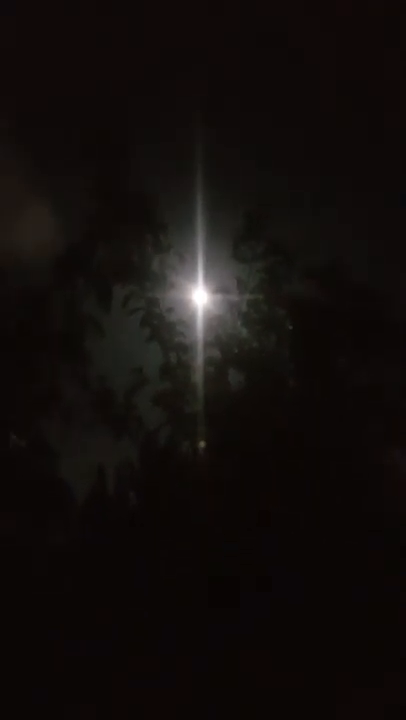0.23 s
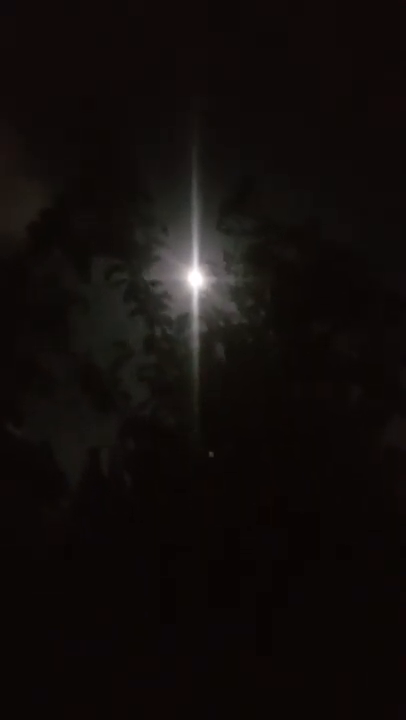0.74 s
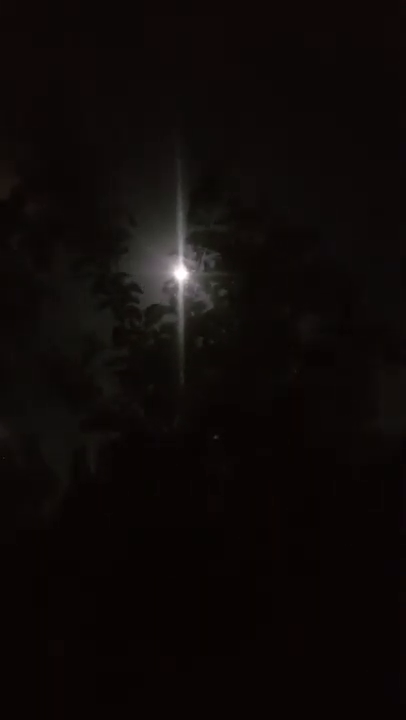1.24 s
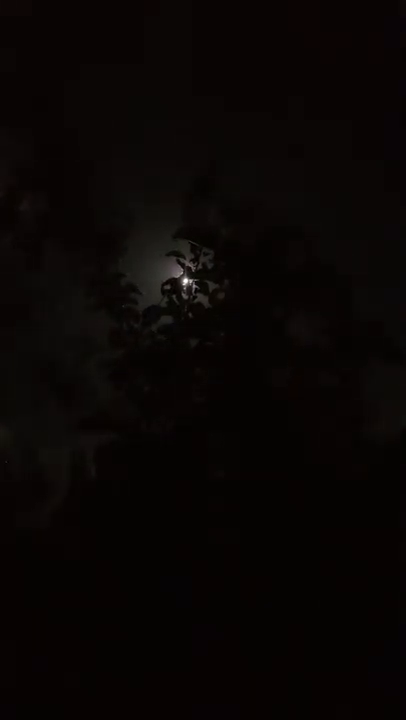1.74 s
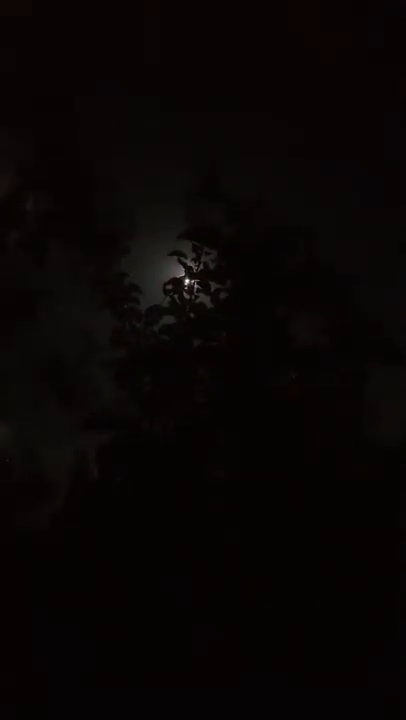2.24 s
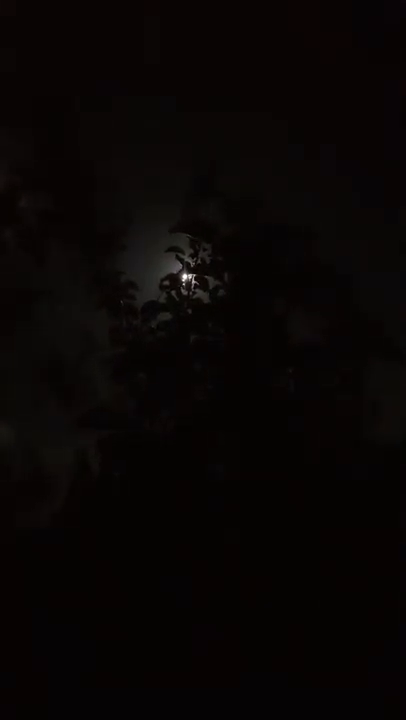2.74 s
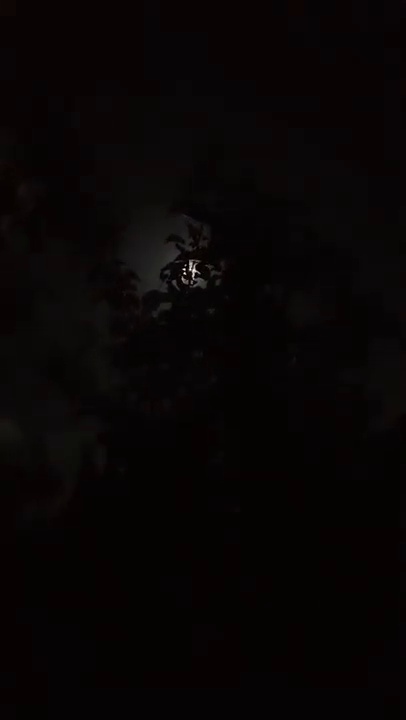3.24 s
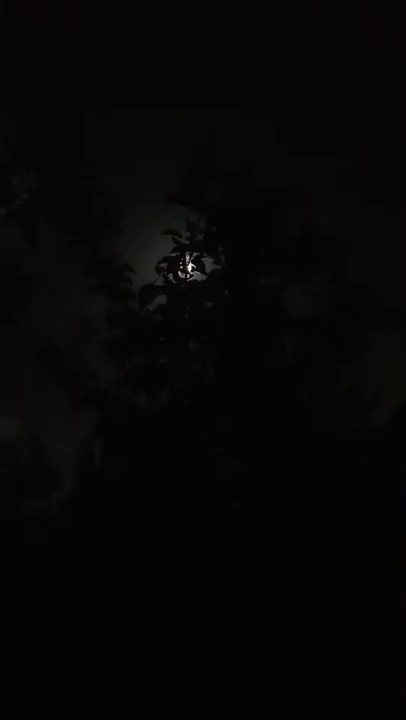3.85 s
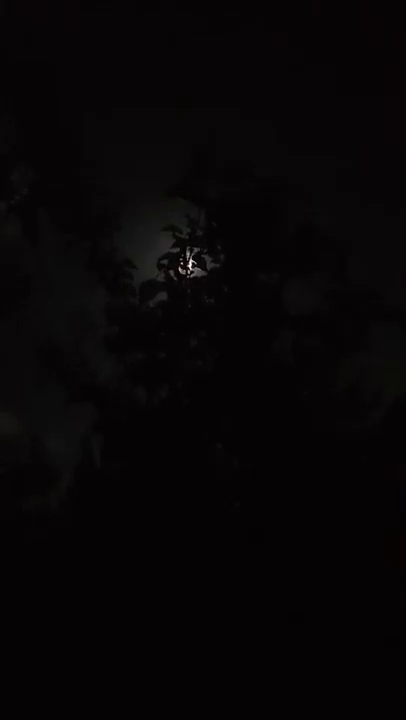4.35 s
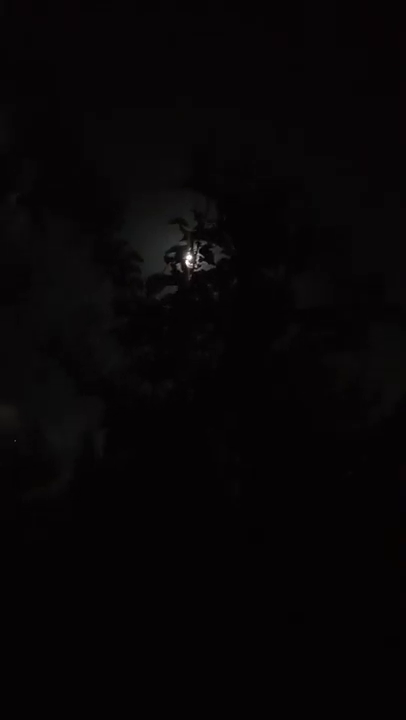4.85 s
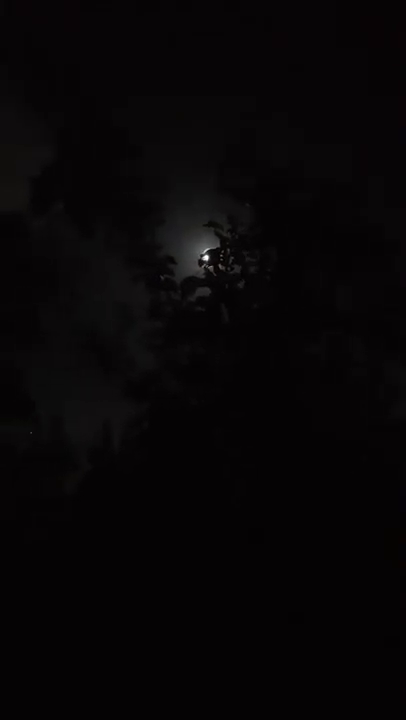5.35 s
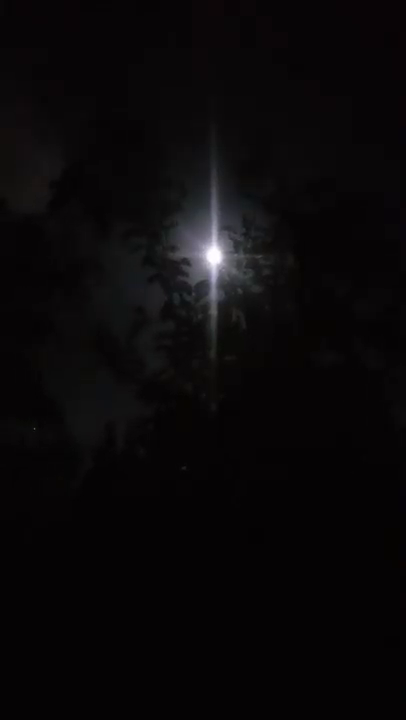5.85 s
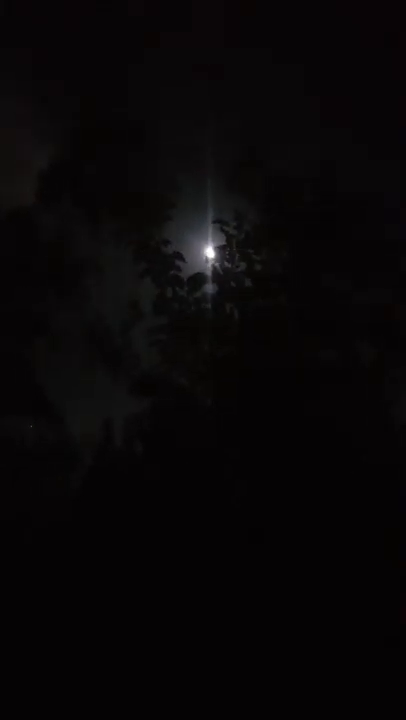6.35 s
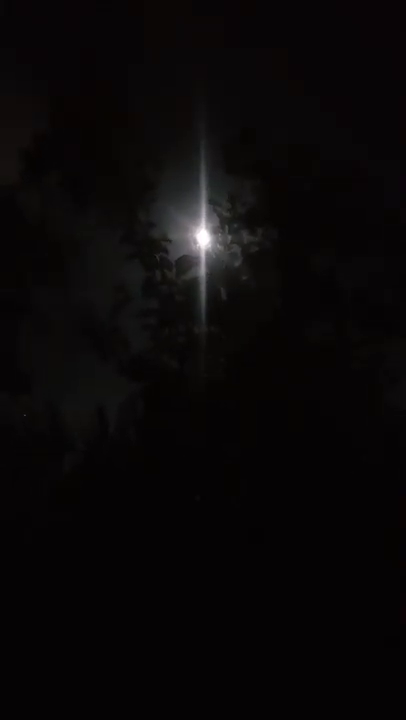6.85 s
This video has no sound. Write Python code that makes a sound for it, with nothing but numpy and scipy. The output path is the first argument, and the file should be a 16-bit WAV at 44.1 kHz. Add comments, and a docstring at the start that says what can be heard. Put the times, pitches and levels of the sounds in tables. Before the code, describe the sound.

Low wind buffets, mostly on the left, open over soft hiss with small clicks of fingers on the device. A nightingale then sings for about two seconds, clear and bright, from faint thin notes to loud repeated whistles, a rough buzz, quick low notes and a final chip. Branches and ground return short echoes. The bird stops; quiet handling noise continues in the night air.

```python
"""Fingers tap, tick and rub on a hand-held camera over a quiet hiss, while light air buffets the microphone.
Out of this, from a tree at night, a nightingale sings one phrase of gliding tones: a peep, a thin quaver,
a sigh, a whistle, four hooked notes, two slurs, a two-voiced buzz, a squeal, four low loops and a sharp chip.
Delayed copies throw the song back from ground and branches, and decaying scatter adds the trees.
Afterwards the hand, hiss and puffs of air, all shaped noise, go on alone."""
import sys
import numpy as np
from scipy import signal
from scipy.fft import rfft, irfft
from scipy.io import wavfile
from scipy.ndimage import uniform_filter1d

SR = 44100
rng = np.random.default_rng(int(sys.argv[2]) if len(sys.argv) > 2 else 0)


def master_out(mix):
    """Clip the mix to full scale and print it as 16-bit PCM to the path in sys.argv[1]."""
    frames = np.transpose(np.atleast_2d(mix))
    ceiling = np.clip(frames, -1, 1)
    pcm = np.round(ceiling * 32767).astype(np.int16)
    wavfile.write(sys.argv[1], SR, pcm)


N = 313551
TIME, BINS = np.arange(N) / SR, np.fft.rfftfreq(N, 1 / SR)  # s, Hz
EDGE_HZ = 15900  # top of the audible band in this scene
CLEAR = .0025  # rms pitch jitter of a clear note, as a share of its pitch

# How each syllable is voiced, before the song stretches and levels it. Each entry: length, attack and release
# in seconds, fade over the note in dB, overtone level in dB, left-right difference in dB.
VOICES = dict(peep=(.018, .004, .008, -1, -8, 0), quaver=(.050, .025, .021, 0, 2, 9),
          sigh=(.042, .016, .007, 0, -2, 0), scoop=(.040, .004, .003, 1, -10, 0),
          whistle=(.037, .014, .012, 0, -10, 0), pip=(.019, .004, .005, 0, -10, -2),
          hook_up=(.039, .023, .006, 0, -3, 3.5), hook_down=(.046, .013, .012, -3, 0, 1),
          slur=(.075, .003, .026, 1, -11, -3.5), buzz_high=(.022, .004, .005, 0, 12, 7.5),
          buzz_low=(.021, .004, .006, 0, 9, 2), squeal=(.042, .008, .005, -5, 0, 8),
          loop_down=(.019, .0025, .006, -13, -5, -4), loop_up=(.025, .012, .007, 2, -5, 0),
          chip=(.020, .007, .008, -5, 0, 2), chip_tail=(.036, .006, .008, -1, -6, 0),
          rasp=(.032, .004, .008, -5, 2, 2))


def amp(db):
    """Decibels to gain."""
    return 10 ** (np.asarray(db) / 20)


def evened(x):
    """Scales to rms 1."""
    return x / np.sqrt(np.mean(abs(x) ** 2) + 1e-20)


def read(points, hz):
    """Reads a table of (Hz, value) on a log-frequency axis."""
    f, value = np.transpose(points)
    return np.interp(np.log(hz + 1), np.log(f + 1), value)


def add(mix, s, sound):
    """Mixes a sound in at a time in seconds."""
    part = mix[:, max(round(s * SR), 0):][:, :sound.shape[-1]]
    part += sound[..., :part.shape[-1]]


def pan(db):
    """Left and right gains for a level difference; positive leans left."""
    return amp(np.array([[.5], [-.5]]) * db)


def noise(count, colour):
    """Noise of rms 1 whose spectrum is shaped by the gain function colour(Hz)."""
    spectrum = rfft(rng.standard_normal(count))
    return evened(irfft(spectrum * colour(np.fft.rfftfreq(count, 1 / SR)), count))


def delayed(x, s):
    """Delays a sound by any fraction of a second, by turning the phase of its spectrum."""
    return irfft(rfft(x) * np.exp(-2j * np.pi * BINS * s), N)


def from_side(x, lag):
    """A sound from one side reaches the left port lag seconds later than the right."""
    return np.array([delayed(x[0], lag), x[1]])


def bell(f, hz, octaves):
    """A smooth band around a centre frequency."""
    return np.exp(-.5 * (np.log2((f + 1) / hz) / octaves) ** 2)


def swish(length, hz, octaves):
    """A short, soft-edged band of noise."""
    count = int(length * SR)
    return noise(count, lambda f: bell(f, hz, octaves)) * signal.windows.tukey(count, .6)


def night_hiss(patchy_db=1.97, flicker_db=2.0, level_db=-57.5):
    """Soft hiss with broad resonances: noise shaped per time-frequency cell, drifting in patches."""
    # Broad spectrum of the hiss. Each row: frequency in Hz, relative density in dB per Hz.
    hiss_colour = [(88, -10), (150, -0.5), (340, -0.5), (756, -13.5), (1010, 0), (1160, -15.5), (1520, -2),
                   (2120, -10), (2430, -2), (3590, -13.5), (4280, -2), (4910, -8.5), (6970, -7),
                   (8310, -17), (15800, -20)]
    # Resonances and dips on top of it. Each row: centre in Hz, width in Hz, boost in dB.
    bumps = [(239, 20, -8.5), (360, 130, 0.5), (671, 61, 7), (1630, 310, 4), (3125, 66, 6),
             (3580, 340, 2.5), (4317, 145, 5.5), (4840, 120, 1.5)]
    # How alike the two ports sound. Each row: frequency in Hz, left-right coherence from 0 to 1.
    likeness = [(60, .4), (130, 0.86), (300, 0.92), (1400, 0.64), (4000, 0.39), (8000, 0.2), (15000, 0.18)]
    # Stereo balance. Each row: frequency in Hz, left-right difference in dB.
    balance = [(60, 2), (110, -6.5), (200, 3), (380, -1.5), (700, 5), (1290, -6.5), (2380, 1), (4400, -3.5),
               (8120, 0), (15000, -7.5)]

    frames, hz = N // 256 + 5, np.fft.rfftfreq(1024, 1 / SR)
    a, b, c, d, patches = rng.standard_normal((frames, 513, 5)).T
    patches = uniform_filter1d(patches, size=14, axis=0)  # smooth over frequency
    patches = evened(uniform_filter1d(patches, size=10, axis=1))  # and over time
    flicker = evened(uniform_filter1d(rng.standard_normal(frames), size=4))  # moves all bands together

    same = read(likeness, hz)[:, None]
    left = a + 1j * b
    right = same * left + np.sqrt(1 - same ** 2) * (c + 1j * d)
    colour = read(hiss_colour, hz)
    colour = colour + sum(db * np.exp(-.5 * ((hz - f) / width) ** 2) for f, width, db in bumps)
    gain = amp(colour[:, None] + patchy_db * patches + flicker_db * flicker)
    cells = np.array([left, right]) * gain * pan(read(balance, hz))[:, :, None]
    hiss = signal.istft(cells, nperseg=1024, noverlap=768)[1][:, :N]
    return amp(level_db) * evened(hiss)


def wind(rise=.4, edge_db=-20, calm_db=-79):
    """Low buffets, unrelated at the two ports: each puff swells quickly and dies more slowly."""
    # Puffs of air, most far stronger at one port. Each row: peak time in seconds, length in seconds,
    # level in dB, left-right difference in dB.
    gusts = [(.058, .06, -45, 17), (.19, .42, -53, 15), (.51, .12, -50, 9), (.567, .06, -32.5, 32),
             (.63, .17, -37, 32), (.755, .08, -36, 33), (.88, .22, -38, 30), (.95, .15, -50, -6),
             (1.05, .22, -49, 18), (1.248, .055, -36, 35), (1.29, .09, -47, 25), (1.46, .16, -54, -2),
             (1.55, .07, -43, 22), (1.615, .13, -40.5, 25), (1.715, .08, -41, 32), (1.91, .24, -53, -12),
             (2.73, .12, -56, -22), (2.8, .1, -52, -24), (3.3, .08, -45, -29), (3.48, .11, -54, -22),
             (4.29, .25, -63, -8), (5.727, .09, -50, -28), (5.98, .11, -56, -17), (6.09, .16, -45.5, -31),
             (6.65, .12, -57, -3)]
    # Spectrum of the turbulence. Each row: frequency in Hz, relative level in dB.
    wind_colour = [(15, -36), (30, -14), (50, 2.5), (75, -0.5), (110, -12.5), (160, -22.5), (250, -33.5),
                   (340, -32.5), (550, -68), (1500, -65)]

    power = np.full((2, N), amp(calm_db) ** 2)  # faint air between the puffs
    for s, length, db, side_db in gusts:
        # distance from the peak: -1 and 1 are the ends, where the puff is down by edge_db
        u = (TIME - s) / (length * np.where(TIME < s, rise, 1 - rise))
        sides = pan(side_db) / np.linalg.norm(pan(side_db))
        power += (sides * amp(db + edge_db * np.minimum(u ** 2, 10))) ** 2
    eddies = np.array([noise(N, lambda f: amp(read(wind_colour, f))) for port in range(2)])
    # even out the eddies' own swells over 50 ms, so that the puffs set the level
    own_power = uniform_filter1d(eddies ** 2, size=2200, axis=1)
    return eddies * np.sqrt(power / (own_power + 0.022))


def trees(x, early_db=7, early_s=.035, shared=0.08):
    """Scatter from trunks and foliage: random impulses, strong at first, then a long faint tail."""
    # How long the scatter rings. Each row: frequency in Hz, time in seconds to fall by 60 dB.
    ring_times = [(300, .6), (1900, .44), (2200, .5), (2700, .72), (4000, .53), (7000, .49), (14000, .66)]

    taps = rng.standard_normal((3, SR)) * (rng.random((3, SR)) < 3000 / SR)  # about 3000 per second
    taps = np.sqrt(shared) * taps[0] + np.sqrt(1 - shared) * taps[1:]  # a little common to both sides
    hz, t, cells = signal.stft(taps, SR, nperseg=256)
    fade_db = -60 * t / read(ring_times, hz)[:, None] + early_db * np.exp(-t / early_s)
    onset = np.clip((t - .006) / 0.0097, 0, 1)
    tail = signal.istft(cells * amp(fade_db) * onset, SR, nperseg=256)[1]
    return signal.fftconvolve(x, tail / np.linalg.norm(tail[0]), axes=1)[:, :N]


def near_echoes(x, ground_s=.0068, ground_db=-8, ground_lag=0.00013):
    """The strong ground echo beats against the gliding notes; branches add more from the sides."""
    # Echoes from near branches. Each row: delay in seconds, level in dB, extra delay on the left in seconds.
    branches = [(.0115, -6, -0.0049), (0.0199, -20, .00027), (.031, -37, 0.018)]

    ground = amp(ground_db) * from_side(delayed(x, ground_s), ground_lag)
    return ground + sum(amp(db) * from_side(delayed(x, s), lag) for s, db, lag in branches)


def tick(t60):
    """A bright snap of noise that dies at once."""
    # Spectrum of a dry tick. Each row: frequency in Hz, relative level in dB.
    tick_colour = [(1000, -16), (3000, -12), (5500, -2), (7300, -1), (8600, -13), (15000, -16.5)]

    t = np.arange(4096) / SR
    return noise(len(t), lambda f: amp(read(tick_colour, f))) * amp(-60 * t / t60)


def tap(hz, t60, octaves=0.41, rise_s=0.00053):
    """A small slip of a finger excites the case, most strongly around one pitch; scaled to peak 1."""
    # Resonances of the camera case. Each row: frequency in Hz, width in Hz, relative level in dB.
    case_modes = [(340, 110, 0), (951, 130, -5.5), (1500, 290, -5), (2570, 1200, -9)]

    def colour(f):
        """The finger's band passed through the case resonances."""
        case = sum(amp(db) / (1 + (2 * (f - mode) / width) ** 2) for mode, width, db in case_modes)
        return bell(f, hz, octaves) * case

    t = np.arange(4096) / SR
    ring = noise(len(t), colour) * amp(-60 * t / t60) * (1 - np.exp(-t / rise_s))
    return ring / abs(ring).max()


def handling(tap_db=0.5, tick_db=-9, faint_tap_db=-60, faint_tick_db=-68, spread_db=3):
    """Taps, ticks and rustles of the hand: short noise bursts, with many fainter ones between."""
    # The firmer finger taps. Each row: start in seconds, peak in dB before tap_db, pitch in Hz.
    firm_taps = [(.195, -49, 980), (.466, -51, 1030), (.709, -48.5, 1390), (.856, -49, 1480),
                 (.908, -48.5, 1460), (.993, -50, 1080), (1.104, -49, 1030), (1.68, -44.5, 1560),
                 (1.726, -47, 1640), (1.866, -46, 1570), (1.897, -44, 1580), (2.325, -41.5, 1420),
                 (2.379, -48, 1580), (2.503, -48, 1490), (2.806, -48.5, 1470), (3.068, -46, 1500),
                 (4.21, -47, 1440), (4.726, -48, 930), (5.13, -37.5, 1430), (5.147, -46.5, 990),
                 (5.229, -43, 1460), (5.457, -44, 1490), (5.567, -49, 1460), (5.799, -46, 1640),
                 (5.818, -48, 790), (6.056, -46, 960), (6.303, -45, 1610), (6.384, -47, 1790),
                 (6.64, -48.5, 1590), (6.825, -47.5, 1450)]
    # The clearer small dry ticks. Each row: start in seconds, level in dB before tick_db.
    clear_ticks = [(.149, -41), (.2836, -45), (.5372, -41.5), (1.4272, -44), (1.6467, -43), (1.815, -43),
                   (3.9744, -43), (4.1727, -41), (4.2983, -44), (5.046, -42), (5.3557, -43), (5.9824, -43),
                   (6.1493, -43), (6.509, -42.5), (7.0433, -43)]
    # Brief rubs of hand and sleeve. Each row: start in seconds, length in seconds, level in dB,
    # centre in Hz, width in octaves.
    rustles = [(.02, .3, -68, 330, .25), (0.995, 0.091, -64, 694, .9), (1.806, .13, -59, 1990, 0.37),
               (1.97, 0.06, -60, 2600, 0.14), (2.167, 0.074, -56, 4900, 0.71),
               (2.231, 0.035, -49, 5250, 0.71), (3.269, 0.15, -60, 371, 0.19), (3.6, .4, -68, 650, .8),
               (5.691, 0.077, -62, 330, 0.21), (5.131, 0.094, -65, 900, 0.65),
               (5.221, 0.031, -59.5, 1330, 0.62), (5.447, 0.16, -63, 720, 0.52),
               (6.131, 0.03, -57.5, 1650, 0.22), (5.95, .35, -65, 340, .3),
               (6.168, 0.051, -56.5, 776, 1.65), (6.589, .1, -60.5, 252, 0.67)]

    out = np.zeros((2, N))
    for s, db, hz in firm_taps:
        add(out, s, amp(db + tap_db) * pan(-1.5) * tap(hz, t60=.045))
    for s, db in clear_ticks:
        add(out, s, amp(db + tick_db) * tick(t60=.029))
    for s, length, db, hz, octaves in rustles:
        add(out, s, amp(db) * pan(-1.5) * swish(length, hz, octaves))
    # faint ones at random times: most are weak, a few stand out
    for when, size, colour, side in rng.random(size=(90, 4)):
        db = faint_tap_db - spread_db * np.log(size + 0.024)
        add(out, when * N / SR, amp(db) * pan(6 * side - 6) * tap(600 + 1200 * colour, t60=0.044))
    for when, size, side in rng.random(size=(130, 3)):
        db = faint_tick_db - spread_db * np.log(size + .03)
        add(out, when * N / SR, amp(db) * pan(8 * side - 4) * tick(t60=0.029))
    return out


def contour(name, snap_s=.003, edge_db=-20):
    """A smooth glide under an attack, a gently changing hold and a release. Rows: s, Hz, dB."""
    # Evenly spaced pitches in Hz that each syllable glides through, before the song's pitch factor.
    glides = dict(peep=[3300, 3150, 3400, 4500], quaver=[6550, 6700, 7280, 6800, 6550],
              sigh=[3980, 3450, 2850], scoop=[1900, 1740, 1850, 2550], whistle=[2550, 3150, 3290, 3290],
              pip=[3285, 3275], hook_up=[4450, 4440, 4740, 5010, 4950],
              hook_down=[4480, 4060, 3830, 3700, 3660], slur=[2700, 2680, 2700, 2600, 2230, 1740],
              buzz_high=[7200, 6950, 6850], buzz_low=[6000, 5450, 5200], squeal=[7250, 6950, 6450, 6050],
              loop_down=[1950, 1520, 1450], loop_up=[1580, 1900, 2170, 2140], chip=[3400, 4380, 3800, 2450],
              chip_tail=[2350, 1800, 1480], rasp=[4900, 4400, 3700])
    # Syllables that start sharp and snap down onto their glide: excess as a share of the pitch.
    snaps = dict(slur=.35, loop_down=.28, buzz_low=.05)

    length, attack, release, fade_db = VOICES[name][:4]
    u, pitches = np.linspace(0, 1, 200), glides[name]
    t = u * length
    curve = np.polyfit(np.linspace(0, 1, len(pitches)), pitches, len(pitches) - 1)
    hz = np.polyval(curve, u) * (1 + snaps.get(name, 0) * np.exp(-t / snap_s))
    edges = np.maximum(1 - t / attack, 0) ** 2 + np.maximum(1 - (length - t) / release, 0) ** 2
    return np.transpose([t, hz, fade_db * u + edge_db * edges])


def syllable(shape, pitch, length, jitter, overtone_db, jitter_hz=900, air_db=-47):
    """A gliding, slightly unsteady tone with two weak overtones and a trace of air noise."""
    # Overtones against the fundamental, before overtone_db. Each row: frequency in Hz, level in dB.
    overtone_levels = [(3500, -24), (5500, -27), (8000, -36), (10000, -28), (11300, -26), (14000, -23),
                       (16000, -28)]

    s, hz, db = np.transpose(shape)
    s = s * length
    t = np.arange(0, s[-1], 1 / SR)
    hz = pitch * uniform_filter1d(np.interp(t, s, hz), size=110)
    shake, flutter = (noise(len(t), lambda f: 1 / (1 + (f / jitter_hz) ** 2)) for each in range(2))
    phase = 2 * np.pi * np.cumsum(hz * (1 + jitter * shake)) / SR
    overtones = 0
    for k in (2, 3):
        level = amp(read(overtone_levels, k * hz)) * (k * hz < EDGE_HZ)
        overtones = overtones + level * np.sin(k * phase)
    # overtones are less steady than the tone
    tone = np.sin(phase) + amp(overtone_db) * overtones * (1 + .5 * flutter)
    # rough notes leak more air
    air = amp(air_db) * (jitter / CLEAR) * noise(len(t), lambda f: f / (f + 2000))
    return (tone + air) * amp(np.interp(t, s, db)) * signal.windows.tukey(len(t), .04)


def nightingale(fizz_hz=13000, fizz_octaves=.16):
    """Strings the syllables into the phrase; the two sides of the syrinx may sound together."""
    # The song. Each row: start in seconds, syllable, pitch factor, length factor, relative level in dB.
    song = [(1.655, "peep", 1, 1, -53), (2.007, "quaver", 1.015, .78, -44),
            (2.040, "quaver", .995, 1.05, -36), (2.085, "quaver", .98, .9, -37.5),
            (2.394, "sigh", 1, 1, -41), (2.396, "sigh", .78, .9, -52), (2.440, "scoop", 1, 1, -55),
            (2.476, "whistle", 1, 1, -31), (2.517, "pip", 1, 1, -35), (2.586, "hook_up", 1.005, .96, -28),
            (2.623, "hook_down", 1.018, .96, -24), (2.728, "hook_up", 1.001, .98, -26),
            (2.762, "hook_down", 1.005, .96, -21.5), (2.866, "hook_up", 1.001, .97, -26),
            (2.901, "hook_down", 1.002, .97, -21.5), (3.010, "hook_up", .99, 1, -25),
            (3.046, "hook_down", 1, .96, -21.5), (3.154, "slur", 1.003, 1, -25),
            (3.292, "slur", .985, .98, -27.5), (3.464, "buzz_high", 1, 1, -38),
            (3.464, "buzz_low", 1, 1, -39), (3.485, "buzz_high", 1.05, .9, -37),
            (3.486, "buzz_low", .95, .85, -34), (3.509, "buzz_high", 1.08, .85, -38),
            (3.508, "buzz_low", 1.04, 1, -34), (3.528, "buzz_high", 1.1, 1.15, -37),
            (3.528, "buzz_low", 1.02, 1, -44), (3.556, "squeal", 1, 1, -26.5),
            (3.655, "loop_down", 1.055, 1, -33), (3.679, "loop_up", 1.055, 1, -34),
            (3.742, "loop_down", 1.005, 1, -33), (3.765, "loop_up", 1.01, 1, -34),
            (3.828, "loop_down", .98, 1, -32), (3.851, "loop_up", .99, 1, -33),
            (3.918, "loop_down", .96, .96, -34), (3.940, "loop_up", .97, .92, -35),
            (4.013, "rasp", .85, .25, -37), (4.017, "chip", 1, 1, -22), (4.033, "rasp", 1, 1, -33),
            (4.035, "chip_tail", 1, 1, -49)]
    # Pitch jitter (rms) of the rough syllables, as a share of the pitch.
    rough = dict(peep=.008, quaver=.013, sigh=.012, hook_up=.004, buzz_high=.027, buzz_low=.042, squeal=.009, chip=.012, rasp=.085)
    # Thin hiss of air as a slur falls. Each entry: seconds into the syllable, length in seconds,
    # level in dB against the syllable.
    fizzes = dict(slur=(.055, .045, -37))

    out = np.zeros((2, N))
    for s, name, pitch, length, level_db in song:
        overtone_db, side_db = VOICES[name][-2:]
        sound = syllable(contour(name), pitch, length, rough.get(name, CLEAR), overtone_db)
        add(out, s, amp(level_db) * pan(side_db) * sound)
        if name in fizzes:
            late, span, fizz_db = fizzes[name]
            add(out, s + late, amp(level_db + fizz_db) * swish(span, fizz_hz, fizz_octaves))
    return out


def scene():
    """The bird is ahead, hiss and hand lie to the right, and the wind acts on the ports themselves."""
    bird = nightingale()
    hand = from_side(handling(), lag=0.00017)
    song = amp(-1.0) * bird + near_echoes(bird) + amp(-9.0) * trees(bird)
    hiss = from_side(night_hiss(), lag=0.0003)
    return song + hand + amp(-8) * trees(hand) + hiss + wind()


def record(dry):
    """A steep low-pass filter ends the band at EDGE_HZ."""
    low_pass = signal.firwin(511, EDGE_HZ, window=("kaiser", 9), fs=SR)
    return signal.oaconvolve(dry, low_pass[None], "same")


dry = scene()
out = record(dry)
master_out(out)
```